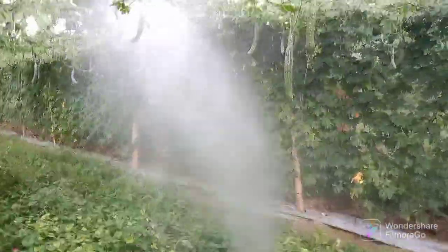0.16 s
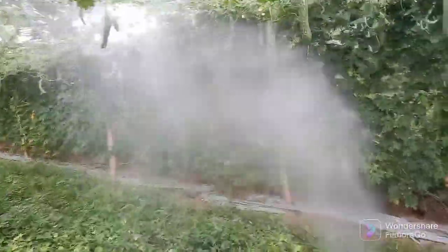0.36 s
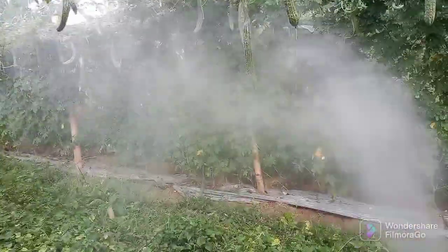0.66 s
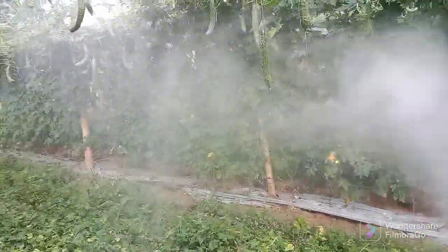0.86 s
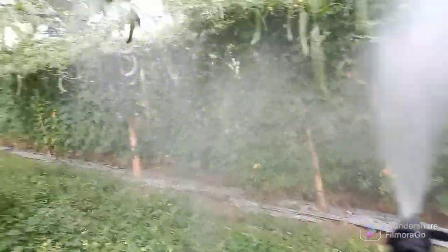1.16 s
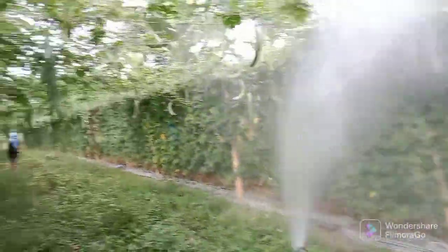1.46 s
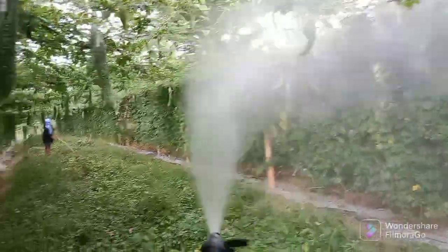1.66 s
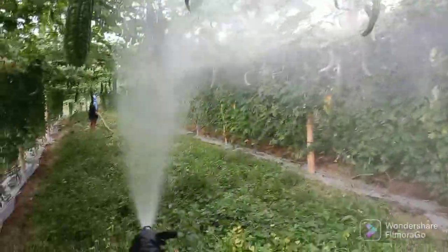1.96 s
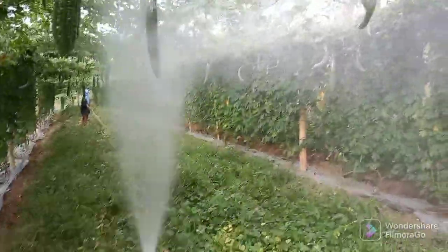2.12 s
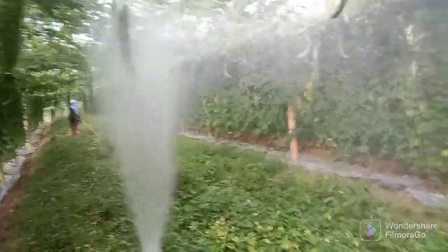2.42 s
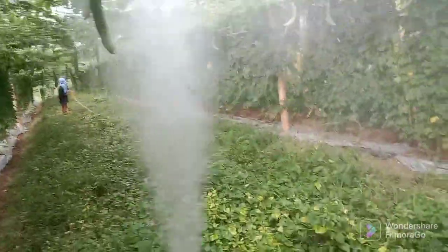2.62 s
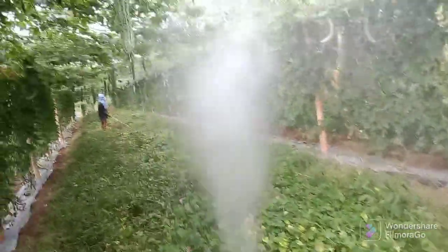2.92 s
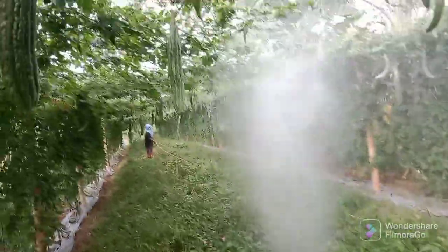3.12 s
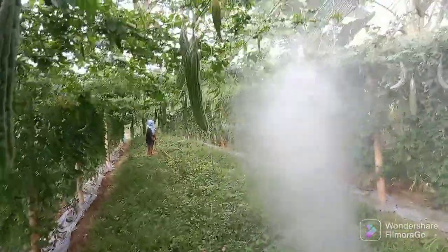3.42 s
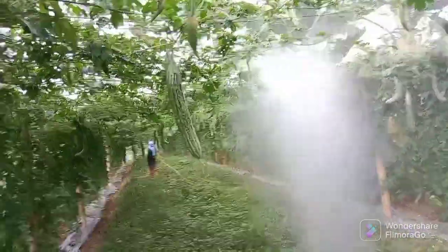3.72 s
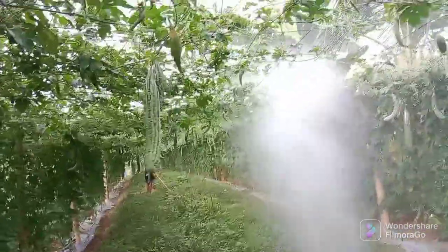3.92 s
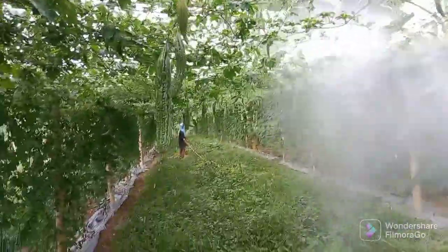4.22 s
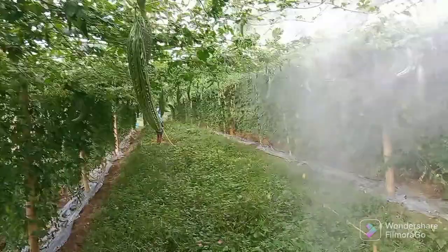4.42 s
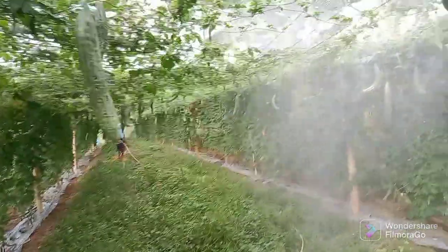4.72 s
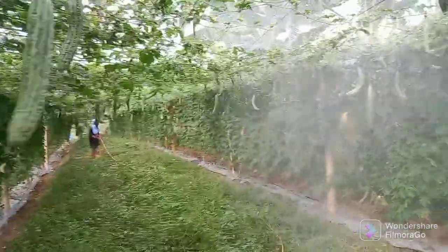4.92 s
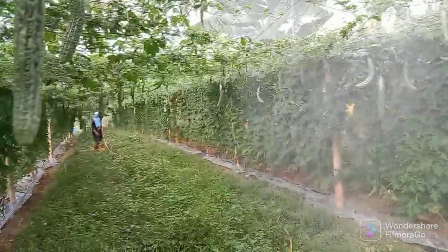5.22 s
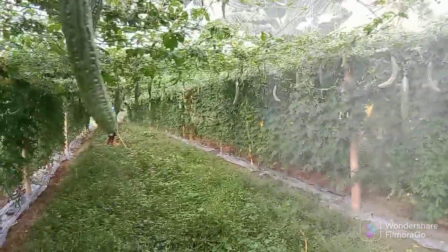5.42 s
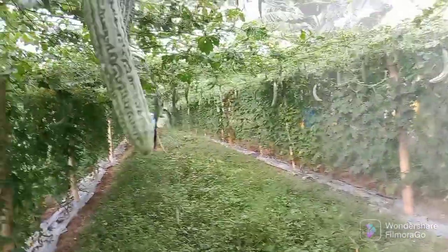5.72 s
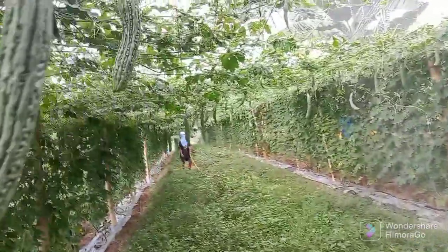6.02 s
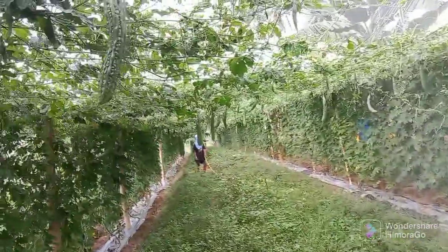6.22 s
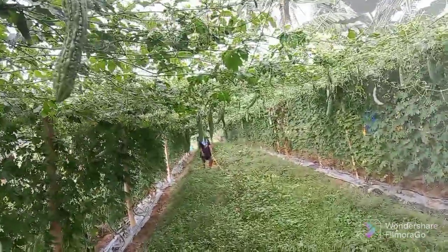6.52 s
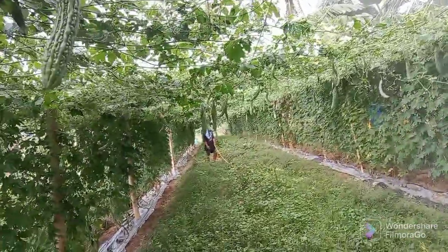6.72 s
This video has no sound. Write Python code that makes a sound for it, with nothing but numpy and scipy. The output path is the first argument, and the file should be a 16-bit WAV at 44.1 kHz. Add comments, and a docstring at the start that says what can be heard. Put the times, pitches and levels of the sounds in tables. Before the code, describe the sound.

Close and dry in an open crop tunnel, a harsh jet of fine spray rushes without pause, its rough flutter like a rapid purr. Its tone sweeps as the lance swings, strong early, weaker around two seconds, fuller after three. A few drops snap, the flow briefly catches past four seconds, then it continues thinner and airy.

```python
"""A hissing jet flutters with each pump stroke and sputters: a power sprayer's lance over a row of vines, close up.
Turbulent noise and drop clicks, throbbed by the pump, pass through moving notches and tilts as the lance swings.
Large drops are ringing noise bursts; gurgles and puffs of air on the microphone are swells of narrow-band noise.
Mist rustles on the leaves as uneven noise and clicks; the draught rumbles as low noise. Both follow the rush."""
import sys
import numpy as np
from scipy import signal
from scipy.fft import rfft, irfft, next_fast_len
from scipy.io import wavfile

SR = 44100
rng = np.random.default_rng(int(sys.argv[2]) if len(sys.argv) > 2 else 0)


def bounce(signal):
    """Save signal as a 16-bit WAV file at the path given by the first command-line argument."""
    frames = np.transpose(np.atleast_2d(signal))
    limited = np.clip(frames, -1, 1)
    pcm = np.round(limited * 32767).astype(np.int16)
    wavfile.write(sys.argv[1], SR, pcm)


N = 302967
TIME = np.arange(N) / SR
SIZE = next_fast_len(N, True)
BINS = np.fft.rfftfreq(SIZE, 1 / SR)
TOP_HZ = 15560
RUSH_REF_DB = -30  # rush level at which leaves and draught have their nominal levels

# Jet levels as the lance swings, before chokes and surges.
# Each row: time in seconds, hiss in dB, low rush in dB, top sizzle in dB.
JET_LEVELS = [(0, -25, -31.5, -23), (.35, -18.5, -29.8, -19.5), (.65, -21.5, -30, -22),
              (1.03, -23, -28.5, -15), (1.3, -20.5, -28.5, -18.5), (1.39, -25, -33, -24.5),
              (1.62, -28, -36, -28.3), (1.85, -29, -35.5, -27.5), (2, -26.5, -33.4, -23.5),
              (2.92, -23.5, -31, -24.3), (3.1, -20, -30.5, -20.3), (4.05, -21, -31, -21),
              (4.17, -24, -31.5, -18), (4.35, -24.5, -29.5, -15.5), (4.53, -22.5, -33.5, -24),
              (5.17, -22, -34, -16.5), (5.3, -26.5, -37, -25.5), (5.7, -28, -34.5, -20.5),
              (6.05, -26, -35.5, -23.5), (6.87, -27, -34.5, -20)]
# Relative spectrum of the jet. Each row: frequency in Hz, density in dB per Hz.
JET_SPECTRUM = [(800, -13), (1350, -5), (1650, -4), (2100, -6.5), (3270, -5.5), (4010, -14), (5020, -5),
                (5730, -1), (6680, -5.5), (7860, -19), (8600, -23), (10800, -17), (12600, -15.5),
                (15300, -7)]


def jet(stroke_db=1.54, sputter_db=0.65, fine_stroke_db=0.54, fine_sputter_db=0.5, surge_db=0.26):
    """The nozzle: coarse drops sputter in the rush and hiss, fine mist sizzles on top; both throb with the pump."""
    hiss_db, rush_db, sizzle_db = jet_levels()
    stroke = pump_stroke()
    flap = walk(310)  # the sheet of liquid flaps before it tears

    coarse_db = stroke_db * stroke + sputter_db * flap
    coarse = breakup(coarse_db, drops_per_s=2600, scatter_db=0.5, drops_db=-6.5)
    fine_db = fine_stroke_db * stroke + fine_sputter_db * unit(0.5 * flap + walk(300))
    fine = breakup(fine_db, drops_per_s=6800, scatter_db=2.0, drops_db=-2.5)

    coarse_low, _ = split(unit(coarse), 7400, order=24)
    _, fine_high = split(unit(fine), 6680, order=24)
    spray = swing(colour(coarse_low + fine_high, JET_SPECTRUM))

    # the jet beams each range differently, so each follows its own level as the lance turns
    rush, upper = split(spray, 3620, order=10)
    hiss, sizzle = split(upper, 9500, order=12)
    aimed = steady(hiss) * undb(hiss_db)
    aimed = aimed + steady(rush) * undb(rush_db)
    aimed = aimed + steady(sizzle) * undb(sizzle_db)
    return aimed * undb(surge_db * walk(4.8))


def jet_levels(choke_s=4.383, choke_db=8.5, attack_s=.012, release_s=.115):
    """Hiss, rush and sizzle in dB; all three drop together when the flow chokes, then build up again."""
    choke = np.interp(TIME - choke_s, [0, attack_s, attack_s + release_s], [0, 1, 0])
    return [db - choke_db * choke for db in curves(JET_LEVELS)]


def pump_stroke(start_hz=35.27, rise_hz_per_s=0.264, wander_hz=0.53):
    """The pump's pressure cycle, from -1 to 1; it slowly gathers speed and wanders a little."""
    pump_hz = start_hz + rise_hz_per_s * TIME + wander_hz * walk(2.26)
    return np.cos(2 * np.pi * np.cumsum(pump_hz) / SR)


def breakup(pressure_db, drops_per_s, scatter_db, drops_db):
    """Turbulent noise plus the clicks of drops tearing off, both following the pressure."""
    torn = rng.random(N) < drops_per_s / SR
    sign = rng.choice([-1, 1], N)
    size_db = scatter_db * np.minimum(rng.exponential(size=N), 5)
    drops = torn * sign * undb(size_db)
    turbulence = rng.standard_normal(N)
    return (turbulence + undb(drops_db) * unit(drops)) * undb(pressure_db)


def swing(x, patchy_db=1.0, wobble_db=5.0, notch_shake=0.0069, edge_shake=0.039):
    """As the lance moves, notches sweep through the hiss, its treble tilts, its low edge shifts, its colour wavers."""
    # A near reflection cancels part of the hiss and moves with the lance.
    # Each row: time in seconds, lowest notch in Hz, strength 0-1.
    reflection = [(0, 3080, 1), (.35, 3650, .38), (.7, 4290, .62), (1.12, 4730, 0.3), (1.27, 3800, 0.75),
                  (2, 3020, .8), (2.25, 3190, 0.9), (2.75, 3196, 0.9), (3.15, 3840, 0.37),
                  (3.95, 3970, .45), (4.18, 4340, 0.6), (4.34, 4570, 0.04), (5.25, 4420, 0.03),
                  (5.45, 4560, 0.1), (6.87, 4300, 0.19)]
    # Low edge of the rush, below which so small a jet radiates little.
    # Each row: time in seconds, edge in Hz, lift just above it in dB.
    low_edge = [(0, 1260, 0.5), (1.45, 1100, 0), (1.9, 1250, 2.5), (2.8, 1330, 2), (3, 1166, 4.5),
                (3.85, 1130, 0), (4.45, 1330, -1), (5.1, 1180, -4), (5.8, 1280, -2), (6.87, 1110, -2)]
    # A broad hollow in the sizzle drifts as the lance turns.
    # Each row: time in seconds, centre in Hz, depth in dB.
    hollow = [(0, 14200, 4), (.35, 12800, 6.5), (.7, 13100, 6), (.9, 15500, 17), (1.35, 15500, -1),
              (1.8, 14100, 4), (2.9, 14300, 4), (3.25, 13200, 7), (3.95, 13400, 6), (4.18, 15200, 8),
              (4.35, 11600, 0), (6.87, 11700, 3.5)]
    hollow_half_width_hz = 590
    # the sizzle tilts upward when strong against the hiss, as the nozzle faces the microphone
    pivot_hz, even_lead_db, tilt = 9600, 1.5, 0.37  # tilt: dB per octave for each dB of lead

    def gain_db(hz, s):
        chance = patches(hz, s, width_hz=87, length_s=0.061)
        shake = np.interp(s, TIME, walk(8.7))  # the hand is never still
        lowest_hz, strength = curves(reflection, s)
        edge_hz, lift_db = curves(low_edge, s)
        hollow_hz, hollow_db = curves(hollow, s)
        hiss_db, _, sizzle_db = curves(JET_LEVELS, s)

        db = patchy_db * chance
        db = db + comb_db(hz, lowest_hz * (1 + notch_shake * shake), strength)
        db = db + notch_db(hz, hollow_hz, hollow_db, hollow_half_width_hz)
        # where sound nearly cancels, small shifts of the jet change the level most
        db = db + wobble_db * chance * np.clip(-db / 20, 0, 1)

        lead_db = sizzle_db - hiss_db - even_lead_db
        octaves = np.log2(np.clip(hz, pivot_hz, TOP_HZ) / pivot_hz)
        db = db + tilt * lead_db * octaves
        return db + edge_db(hz, edge_hz * (1 + edge_shake * shake), lift_db)

    return reshape(x, gain_db)


def comb_db(hz, lowest_hz, strength, spread=1):
    """The reflection's notches: deep and narrow when it is strong, shallow and wide when it is weak."""
    # Each row: multiple of the lowest notch, half width at full strength in Hz, full depth in dB,
    # power of the strength.
    notches = [(1.001, 263, 30, 0.94), (2.03, 497, 7, 0.5)]
    strength = np.clip(strength, 0, 1)
    widen = 1 + spread * (1 - strength)
    return sum(notch_db(hz, multiple * lowest_hz, depth_db * strength ** power, half_width_hz * widen)
               for multiple, half_width_hz, depth_db, power in notches)


def notch_db(hz, centre_hz, depth_db, half_width_hz):
    """One rounded dip in a spectrum; a negative depth makes a peak."""
    return -depth_db / (1 + ((hz - centre_hz) / half_width_hz) ** 2)


def edge_db(hz, edge_hz, lift_db, lift_above_hz=200, lift_width_hz=520):
    """A steep fall below the edge and a broad shoulder above it."""
    offset = (hz - edge_hz - lift_above_hz) / lift_width_hz
    shoulder = np.exp(-np.minimum(offset ** 2, 20))
    return lift_db * shoulder - 20 * np.log10(1 + (edge_hz / (hz + 1)) ** 24)


def spits(crest_db=3.5):
    """Single large drops snap off and ring briefly with the colour of the jet."""
    # Each row: start in seconds, approximate peak in dB, time to fall 60 dB in seconds.
    drop_rows = [(.261, -15, .004), (.45, -9, .004), (.499, -10, .0036), (4.377, -8, 0.011),
                 (4.399, -12, .01), (4.428, -17, .008), (5.935, -15, .022), (6.047, -11, .006)]
    envelope = np.zeros(N)
    for s, peak_db, ring_s in drop_rows:
        decay = np.exp(-np.minimum(np.log(1000) * np.abs(TIME - s) / ring_s, 20))
        envelope += undb(peak_db - crest_db) * (TIME >= s) * decay
    ringing = envelope * colour(rng.standard_normal(N), JET_SPECTRUM)
    return split(ringing, 1600)[1]


def gurgles():
    """Hollow gurgles in the spray: swells of resonant noise."""
    # Each row: centre in seconds, frequency in Hz, level in dB, half length in seconds.
    gurgle_rows = [(.34, 702, -51.5, .047), (.81, 715, -53, .03), (1.29, 626, -45.5, 0.047),
                   (1.38, 770, -54, 0.09), (1.58, 730, -53.5, 0.086), (1.78, 717, -54, 0.057),
                   (2.44, 968, -49, 0.078), (2.76, 953, -50.5, 0.13), (5.58, 972, -55.5, .093)]
    return swells(gurgle_rows, width_hz=230)


def leaves(flutter_db=2.2, patchy_db=3.0, level_db=-52.5, growth=1.07):
    """Soft, uneven patter of mist on foliage; it grows by `growth` dB per dB of rush."""
    # Relative spectrum of the leaves. Each row: frequency in Hz, density in dB per Hz.
    leaf_spectrum = [(120, -7.5), (250, -1.5), (450, -7.5), (720, -1.5), (1000, 3.5), (1500, -6),
                     (4000, -50)]
    # The jet sweeps across leaves close by.
    # Each row: centre in seconds, rise of the patter in dB, half length in seconds.
    splashes = [(1.105, 10, 0.021), (1.24, 7, 0.047)]
    patter = breakup(flutter_db * walk(45), drops_per_s=620, scatter_db=0.5, drops_db=-6.5)
    patter = colour(patter, leaf_spectrum)

    def patch_db(hz, s):
        return patchy_db * patches(hz, s, width_hz=54, length_s=0.026)

    patter = reshape(patter, patch_db, size=1024)
    splash_db = sum(db * bump(s, half_s) for s, db, half_s in splashes)
    _, rush_db, _ = jet_levels()
    return unit(patter) * undb(level_db + growth * (rush_db - RUSH_REF_DB) + splash_db)


def draught(buffet_db=2.0, level_db=-59, growth=1):
    """Air dragged along by the spray rumbles on the microphone; it grows by `growth` dB per dB of rush."""
    # Relative spectrum of the draught. Each row: frequency in Hz, density in dB per Hz.
    draught_spectrum = [(20, -23), (50, -24), (70, 3.5), (100, 0), (135, 2.5), (190, -3.5), (280, -21),
                        (500, -16), (1500, -68)]
    # Puffs of air on the microphone.
    # Each row: centre in seconds, frequency in Hz, level in dB, half length in seconds.
    puffs = [(.6, 105, -54, .09), (.85, 105.4, -52, 0.094), (1.1, 121, -53, 0.029), (1.25, 129.7, -45, .03),
             (1.74, 105, -57, .045), (2.21, 132, -47, .063), (2.37, 106, -51, .035), (3.06, 86, -51, .064),
             (3.16, 131, -45.5, .036), (3.84, 120, -46, .045), (3.98, 89, -58, 0.08),
             (4.32, 105, -61, 0.053), (4.95, 103.5, -53, .05), (5.23, 136, -49, 0.042),
             (5.75, 80.3, -60, .1)]
    eddies = rng.standard_normal(N) * undb(buffet_db * walk(8.3))
    _, rush_db, _ = jet_levels()
    rumble = colour(eddies, draught_spectrum) * undb(level_db + growth * (rush_db - RUSH_REF_DB))
    return rumble + swells(puffs, width_hz=88)


def swells(table, width_hz):
    """Short, rounded bursts of resonant noise."""
    wander = walk(width_hz / 2) + 1j * walk(width_hz / 2)
    return sum(band(hz, wander) * undb(db) * bump(s, half_s) for s, hz, db, half_s in table)


def band(hz, wander):
    """Noise in one narrow resonance: a tone whose size and phase wander at random."""
    return np.real(wander * np.exp(2j * np.pi * hz * TIME))


def bump(s, half_s):
    """A rounded rise and fall around a moment, 1 at its top."""
    return np.exp(-np.minimum(((TIME - s) / half_s) ** 2, 20))


def walk(rate_hz):
    """Smooth chance with a spread of 1, changing about `rate_hz` times a second."""
    return unit(smooth(rng.standard_normal(N), rate_hz))


def patches(hz, s, width_hz, length_s):
    """Smooth chance over frequency and time, with a spread of 1."""
    field = rng.standard_normal((len(hz), len(s)))
    for axis, steps in enumerate((width_hz / hz[1, 0], length_s / s[1])):
        lowpass = signal.butter(2, min(1 / steps, .9), output="sos")
        field = signal.sosfiltfilt(lowpass, field, axis=axis, padtype="even")
    return unit(field)


def reshape(x, gain_db, size=512):
    """Filter a sound by a gain that moves: gain_db(Hz column, s row)."""
    overlap = size - size // 4
    hz, s, frames = signal.stft(x, SR, nperseg=size, noverlap=overlap)
    frames = frames * undb(gain_db(hz[:, None], s))
    return signal.istft(frames, SR, nperseg=size, noverlap=overlap)[1][:N]


def colour(x, points):
    """Weight a sound's spectrum by (Hz, dB) points, then scale to an rms of 1."""
    hz, db = np.transpose(points)
    bin_db = np.interp(np.log(BINS + 1), np.log(hz), db)
    return unit(filtered(x, undb(bin_db)))


def split(x, hz, order=8):
    """The parts of a sound below and above a frequency."""
    low = filtered(x, 1 / (1 + (BINS / hz) ** order))
    return low, x - low


def steady(x, smooth_hz=5):
    """Hold a sound's slow level at an rms of 1; its quick flutter stays."""
    return x / np.sqrt(np.maximum(smooth(x ** 2, smooth_hz), 1e-12))


def smooth(x, hz):
    """Keep mainly changes slower than `hz`, with a Gaussian low-pass."""
    return filtered(x, np.exp(-np.minimum((BINS / hz) ** 2, 20)))


def filtered(x, gain):
    """Weight a sound's spectrum with one gain per bin."""
    return irfft(rfft(np.resize(x, SIZE)) * gain, SIZE)[:N]


def curves(table, times=TIME):
    """The columns of a table, joined by straight lines in time."""
    s, *columns = np.transpose(table)
    return [np.interp(times, s, c) for c in columns]


def undb(db):
    """Decibels to gain."""
    return 10 ** (np.asarray(db) / 20)


def unit(x):
    """Scale to an rms of 1."""
    return x / np.sqrt(np.mean(x ** 2))


def scene():
    """Jet with spits and gurgles, leaves and draught, summed to one channel without reverberation."""
    return (jet() + spits() + gurgles() + leaves() + draught())[None]


def record(dry):
    """The recorder cuts the top steeply: an elliptic low-pass."""
    lowpass = signal.ellip(12, .2, 80, TOP_HZ, fs=SR, output="sos")
    return signal.sosfilt(lowpass, dry)


dry = scene()
out = record(dry)
bounce(out)
```